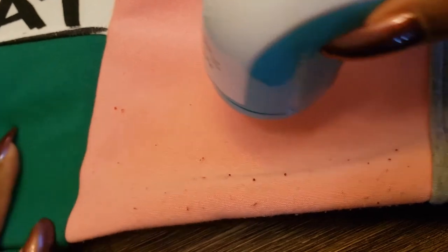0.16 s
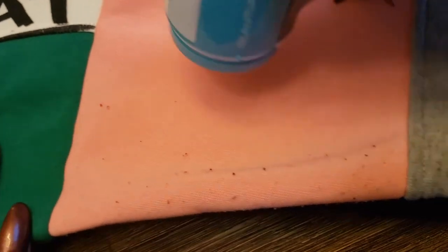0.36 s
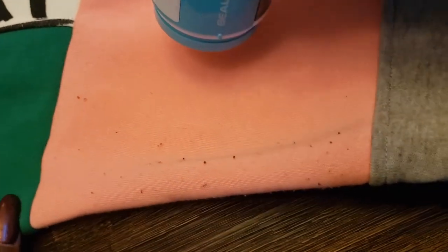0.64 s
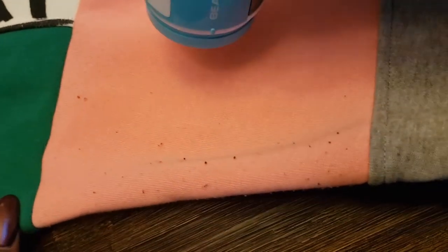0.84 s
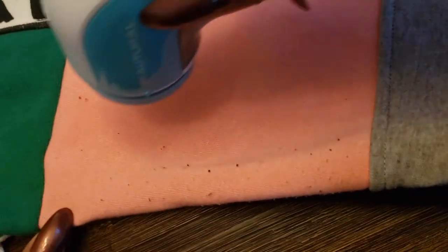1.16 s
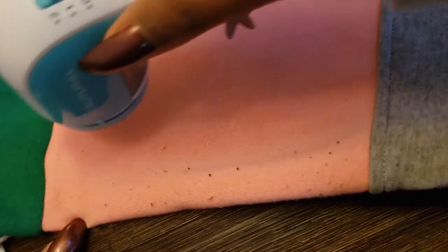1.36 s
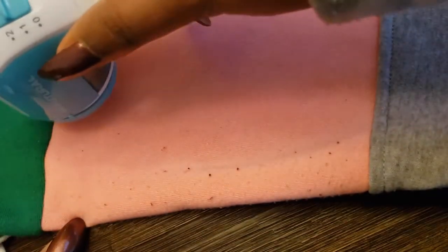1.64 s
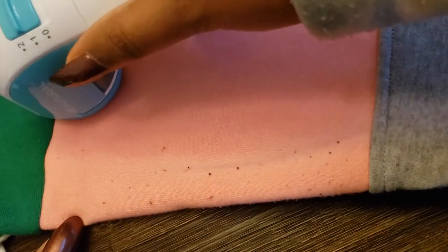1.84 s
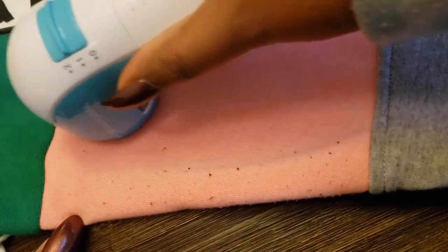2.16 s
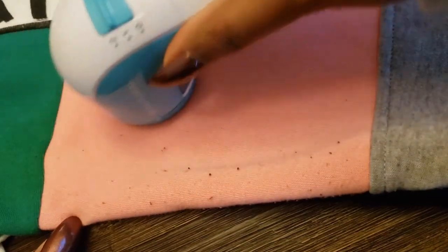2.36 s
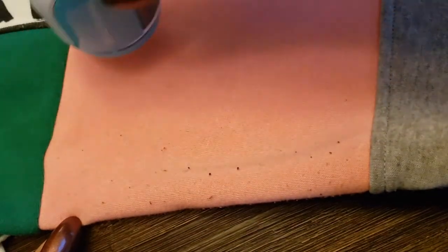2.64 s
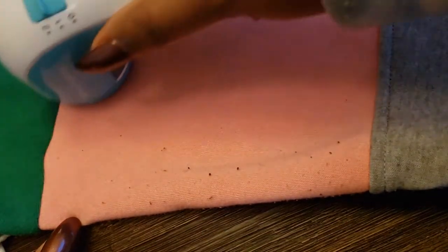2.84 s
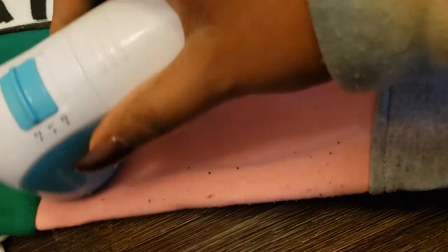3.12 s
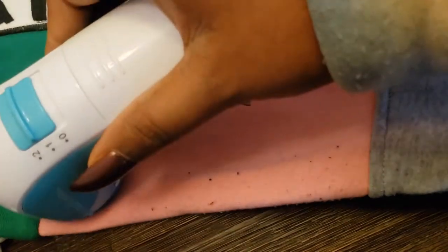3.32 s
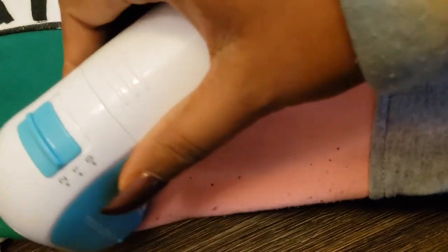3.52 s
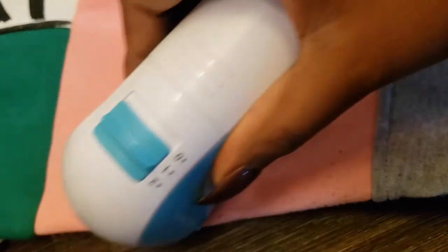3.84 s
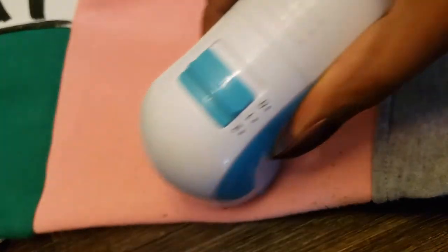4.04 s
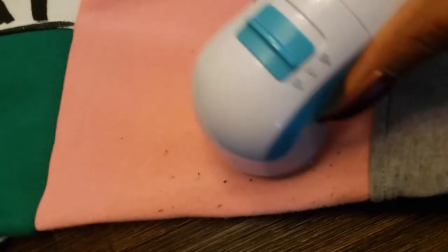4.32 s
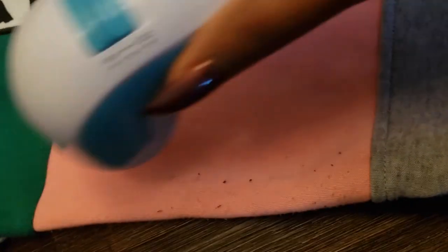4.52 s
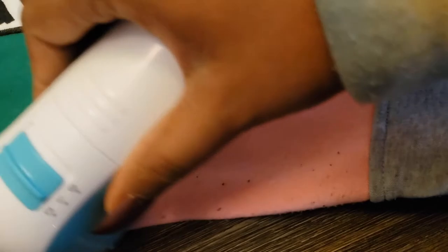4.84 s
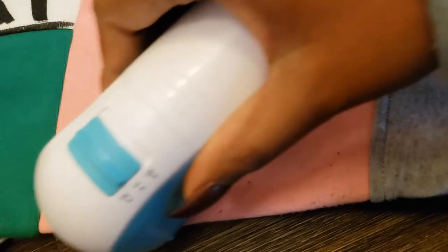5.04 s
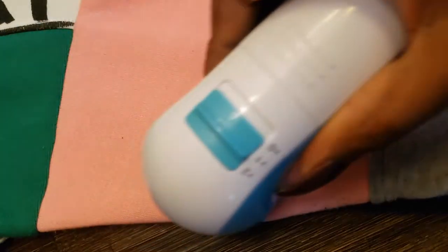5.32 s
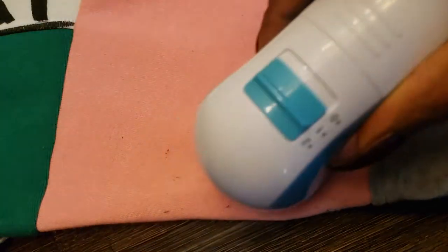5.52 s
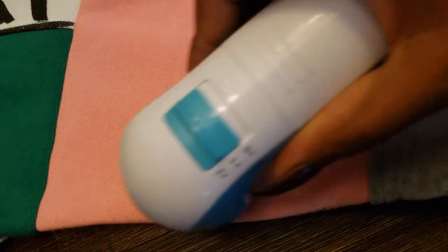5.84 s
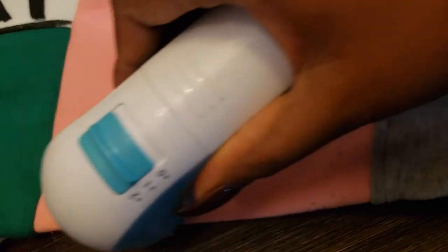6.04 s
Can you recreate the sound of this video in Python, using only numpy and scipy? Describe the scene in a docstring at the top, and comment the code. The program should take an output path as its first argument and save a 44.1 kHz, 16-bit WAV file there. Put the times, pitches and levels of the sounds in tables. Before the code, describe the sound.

It opens on a quiet room with a few soft knocks on a table. At about 0.3 seconds a small battery fabric shaver cuts in abruptly, already running and close to the microphone: a bright, metallic buzz with a thin motor whine, nearly constant in pitch. It steps up in level at 1.6 seconds. From 1.7 to 2.4 seconds, and again from 2.7 to 4.3, the head rubs over a sweatshirt, turning the buzz into a hissing rasp, with small irregular crunches as the blades catch lint. A faint low rumble and light bumps come through the table. Around 4.4 seconds the shaver mostly lifts and its buzz rings clearer and louder. From 4.8 seconds more strokes follow closely, with rasping and frequent crackles, and the shaver is still running at the end, a little after 6 seconds.

```python
"""Fabric shaver on cloth

A quiet room with soft knocks on a table gives way abruptly to a battery fabric shaver, heard close.
Its motor radiates harmonics of the shaft rate. The blades sweep the same foil holes every turn, and
this periodic excitation buzzes. Where the head meets the cloth the excitation becomes random: the
buzz turns to a rasp, lint knots crunch, and forced vibration makes the table rumble."""
import sys
import numpy as np
from scipy import signal
from scipy.fft import rfft, irfft, next_fast_len
from scipy.io import wavfile
from scipy.ndimage import uniform_filter1d, map_coordinates

SR = 44100
rng = np.random.default_rng(int(sys.argv[2]) if len(sys.argv) > 2 else 0)


def digitize_waveform(pressure):
    """Quantize a signal to 16-bit integers and store it at the path in sys.argv[1].

    Rows of a 2-D input are taken as channels; values are limited to [-1, 1].
    """
    field = np.atleast_2d(pressure).T
    bounded = np.clip(field, -1, 1)
    quanta = np.round(bounded * 32767).astype(np.int16)
    wavfile.write(sys.argv[1], SR, quanta)


N = 272614
TIME = np.arange(N) / SR
SIDES = np.array([[1], [-1]])  # left, right


def amp(db):
    """Amplitude ratio of a level in decibels."""
    return 10 ** (np.asarray(db) / 20)


def unit(x):
    """Normalisation of each channel to unit RMS."""
    return x / np.sqrt(np.mean(x ** 2, -1, keepdims=True) + 1e-20)


def curves(rows):
    """Linear interpolation in time: one value per sample for each column after the first."""
    times, *columns = np.transpose(rows)
    return [np.interp(TIME, times, column) for column in columns]


def wobble(rate):
    """Random modulation: straight lines between Gaussian values, rate of them a second."""
    knots = rng.standard_normal(int(N * rate / SR) + 2)
    return np.interp(TIME * rate, np.arange(len(knots)), knots)


def filtered(x, response):
    """Linear filtering: the spectrum of x is multiplied by a frequency response."""
    size = next_fast_len(N + SR // 2)
    return irfft(rfft(x, size) * response(np.fft.rfftfreq(size, 1 / SR)), size)[..., :N]


def colour(points):
    """Spectral envelope through (f/Hz, level/dB) points on a logarithmic frequency axis."""
    f, db = np.transpose(points)
    return lambda hz: amp(np.interp(np.log(hz + 1), np.log(f + 1), db, left=-120, right=-120))


def resonant(modes):
    """Modal superposition: second-order resonances summed with alternating sign."""
    return lambda f: sum((-1) ** k * amp(db) * 1j * f * width / (f0 * f0 - f * f + 1j * f * width)
                         for k, (f0, width, db) in enumerate(modes))


def stereo_noise(correlation):
    """Partial coherence: two channels of white noise share a common part."""
    common, opposed = rng.standard_normal((2, N))
    angle = np.arccos(np.clip(correlation, -1, 1)) / 2
    return np.cos(angle) * common + SIDES * np.sin(angle) * opposed


def shaded(x, depth_db):
    """Shadowing and reflection by hand and cloth: each channel's spectrum shifts in random patches."""
    spectra = signal.stft(x, nperseg=512)[2]
    field = uniform_filter1d(rng.standard_normal(spectra.shape), size=5, axis=1)
    field = uniform_filter1d(field, size=30, axis=2)
    return signal.istft(spectra * amp(depth_db * field / field.std()), nperseg=512)[1][:, :N]


# Room noise spectrum: f/Hz, relative density/dB
ROOM_SPECTRUM = [(24, -45), (40, -22), (548, -6.5), (704, -14.5), (817, -18), (1100, -21), (1350, -22),
                 (1450, -18), (3140, -36), (3740, -41.5), (15500, -53)]
def room(level_db=-58.5):
    """Ambient noise: a broad, mostly low spectrum, coherent in both channels."""
    return amp(level_db + wobble(25)) * unit(filtered(stereo_noise(1.0), colour(ROOM_SPECTRUM)))


# Contacts with the table: t/s, relative thud level/dB, relative tick level/dB
KNOCKS = [(0.154, -27, -42.5), (0.194, -43, -52), (0.259, -30, -55), (0.27, -52, -73)]
# Modes of the struck table and of the plastic shell: f/Hz, relative level/dB, T60/s
THUD_MODES = [(166, -13.5, 0.31), (230, 1, 0.07), (600, -26, 0.032)]
TICK_MODES = [(1950, 14, 0.018), (2670, -2, 0.038), (2880, -5.5, 0.059), (3450, 10.5, 0.013),
              (4330, -7, 0.018)]
def knocks():
    """Damped free vibration: after a soft impact the table thuds and the shell ticks."""
    out, t = np.zeros(N), TIME[:SR // 8]
    for start, thud_db, tick_db in KNOCKS:
        for modes, db, rise_s in (THUD_MODES, thud_db - 5.5, .004), (TICK_MODES, tick_db - 9.5, .001):
            ring = sum(amp(level - 60 * t / t60) * np.sin(2 * np.pi * hz * t) for hz, level, t60 in modes)
            out[round(start * SR):][:len(t)] += amp(db) * ring * (1 - np.exp(-t / rise_s))
    return out


# Modes of the table top and of the room: f/Hz, bandwidth/Hz, relative level/dB
TABLE_MODES = [(147, 10.3, 6.5), (200.2, 10.8, 6), (245, 16.3, -1), (314, 29, -3.5)]
ROOM_MODES = [(35, 24, -14), (54.5, 8.9, -0.5), (74.3, 11, 3.5)]
# Jolts of the head against the table: t/s, level/dB
JOLTS = [(1.4, -65.5), (1.72, -64.5), (2.09, -70), (3.1, -70), (3.66, -59), (3.899, -62.5), (4.9, -73),
         (5.36, -57.5), (5.66, -67)]
def rumble(head_db, load, jolt_s=0.11):
    """Forced vibration: the dragged head drives table and room modes, more strongly under load."""
    jolts = sum(amp(db) * np.exp(-((TIME - at) / jolt_s) ** 2) for at, db in JOLTS)
    drag = amp(head_db - 29 + 3 * load)
    table = (drag + jolts) * unit(filtered(stereo_noise(0.92), resonant(TABLE_MODES)))
    boom_gain = amp(-74.5 + 5.5 * load + 1.6 * wobble(1.72))
    boom = boom_gain * unit(filtered(stereo_noise(0.94), resonant(ROOM_MODES)))
    return (table + boom) * amp(-0.8 * SIDES)


# Spectrum of the fan behind the blades: f/Hz, relative density/dB
FAN_SPECTRUM = [(250, -5), (400, -3.5), (800, -0.5), (1400, -5), (2500, 0.5), (4000, -8.5), (5500, -22)]
def fan(head_db, load):
    """Flow noise: air rushing through the head radiates a continuous spectrum."""
    return amp(head_db - 20 + 3.75 * load) * unit(filtered(stereo_noise(0.84), colour(FAN_SPECTRUM)))


# Strokes on the cloth: start t/s, end t/s, load (share of rasp, 0-1), rubbing level/dB
STROKES = [(1.72, 2.404, 0.61, -54.5), (2.69, 3.315, 0.56, -55.5), (3.348, 3.81, 0.68, -58),
           (3.817, 4.037, 0.7, -49.5), (4.03, 4.31, 0.85, -44.5), (4.415, 4.53, 0.43, -65),
           (4.754, 5.049, 0.9, -56), (5.06, 5.434, 0.72, -48.5), (5.447, 5.637, 0.6, -47.5),
           (5.615, 6.255, 0.74, -46)]
def cloth_contact(ramp_s=0.07, idle_load=0.07):
    """Contact loading: load and rubbing amplitude rise as the head lands and fall as it lifts."""
    start, end, load, rub_db = np.transpose(STROKES)
    inside_s = np.minimum(TIME - start[:, None], end[:, None] - TIME)
    contact = np.clip(inside_s / ramp_s + .5, 0, 1)
    return np.clip(load @ contact, idle_load, 1), amp(rub_db) @ contact


# Spectrum of cloth brushing the foil: f/Hz, relative density/dB
RASP_SPECTRUM = [(1200, -8.5), (1700, -2), (2100, 1), (2450, 5.5), (3000, -2.5), (3600, -4.5), (4800, -4.5),
                 (6000, -42)]
def cloth_rasp(turns, rub):
    """Stick-slip friction: threads catch and let go at uneven moments, tugged anew every turn."""
    tugs = np.cumsum(150 * amp(9.1 * wobble(90))) / SR
    grain = amp(-13 * np.sqrt(tugs % 1) + 3 * wobble(140) + 1.5 * wobble(15) - 5 * (turns % 1))
    gain = rub * amp(1.5 * wobble(6) + 1.5 * wobble(30))
    friction = filtered(stereo_noise(-0.035) * grain, colour(RASP_SPECTRUM))
    return gain * unit(shaded(friction, depth_db=1.5)) * amp(SIDES)


# Lint knots caught by a blade: t/s, relative grit level/dB, relative crunch level/dB
SNAGS = [(1.767, -43, -40), (2.053, -32, -46), (2.2, -40, -42), (2.798, -38, -50), (3.032, -45, -40),
         (3.413, -33, -43), (3.552, -48, -42), (3.6793, -30, -37), (3.794, -44, -34), (3.9457, -30, -46),
         (4.0595, -39, -41), (4.1056, -35, -31), (4.198, -34, -34), (4.872, -42, -31), (5.034, -42, -42),
         (5.1042, -30, -33), (5.14, -44, -32), (5.205, -42, -31), (5.559, -42, -36), (5.645, -47, -33),
         (5.735, -40, -30.5), (5.8594, -39, -42), (5.954, -40, -44)]
# Spectra at the foil (grit) and through the shell (crunch): f/Hz, relative density/dB
GRIT_SPECTRUM = [(1200, -10), (2400, 1), (4500, 5), (7000, -2), (11000, 24), (16000, 2)]
CRUNCH_SPECTRUM = [(1200, -16), (1800, 5), (2400, 7.5), (3100, -3), (4200, -4), (6000, -18)]
def snags(rise_s=0.00066):
    """Transient excitation: each knot gives decaying bursts of bright grit and duller crunch."""
    gains, t = np.zeros((2, N + SR)), TIME[:SR // 20]
    t60 = np.array([[.07], [.05]])  # grit, crunch
    burst = amp(-6 - 60 * t / t60) * (1 - np.exp(-t / rise_s))
    for start, grit_db, crunch_db in SNAGS:
        gains[:, round(start * SR):][:, :len(t)] += amp([[grit_db], [crunch_db]]) * burst
    return sum(gain[:N] * unit(filtered(stereo_noise(0.17), colour(spectrum)))
               for gain, spectrum in zip(gains, (GRIT_SPECTRUM, CRUNCH_SPECTRUM)))


# Rotation rate of the shaft: t/s, f/Hz
SHAFT_RATE = [(0.3, 114.5), (0.73, 114.8), (1.25, 114.3), (1.69, 115.0), (1.87, 113.5), (2.05, 113.5),
              (2.38, 115.7), (2.8, 115.3), (3.33, 116.0), (4.21, 116.0), (4.4, 116.8), (4.62, 115.0),
              (4.92, 115.3), (5.05, 116.1), (5.54, 116.4), (5.8, 115.8), (6.02, 114.1), (6.18, 114.0)]
def shaft_turns():
    """Phase as the integral of frequency, counted in turns of the shaft."""
    return np.cumsum(curves(SHAFT_RATE)[0]) / SR


# Armature hum (order 6) as the grip shifts: t/s, level/dB
HUM = [(0.3, -63.5), (0.31, -62.5), (1.4, -62), (1.48, -62), (1.74, -56.5), (2.0, -58), (2.05, -67),
       (2.18, -57), (2.35, -60.5), (2.82, -56.5), (3.0, -62.5), (3.07, -57.5), (3.2, -60.5), (3.28, -55.5),
       (3.44, -63), (3.56, -53), (3.79, -61), (3.85, -54), (3.93, -59), (4.2, -54), (4.28, -57.5),
       (4.54, -52.5), (4.77, -56), (4.88, -51.5), (5.0, -54.5), (5.07, -60.5), (5.28, -51.5), (5.38, -55.5),
       (5.9, -52), (6.02, -58), (6.15, -50.5), (6.18, -52)]
# Tones through the shell: t/s, order 3 level/dB, order 18 level/dB, its left lead/rad, order 30 level/dB
SHELL_TONES = [(.3, -76.5, -59.5, -1.5, -61), (.9, -75, -55, -0.5, -56.5), (1.5, -76.5, -58.5, -2.5, -62),
               (1.77, -67.5, -58, -3, -58), (2.15, -72, -67, -2.5, -77), (2.5, -74, -52, -1.5, -60),
               (3.0, -67, -59, -3.5, -50), (3.35, -79, -59, -4, -69), (3.55, -62, -61, 1.5, -62),
               (3.9, -68.5, -57, 1.7, -53.5), (4.15, -73, -48.5, -0.5, -44.5), (4.55, -72, -47.5, -2, -57),
               (4.85, -59.5, -53, -2.5, -64), (5.08, -62, -55, -5.5, -48), (5.3, -64, -51.5, -8, -44),
               (5.7, -69, -48, -6, -48), (5.95, -62, -54, -4.5, -53), (6.18, -69, -43, -4.5, -49)]
# Further harmonics of motor and shell: order, level/dB re smoothed hum, left lead/rad
MOTOR_ORDERS = [(1, -17, 0.5), (5, -13.5, 0.95), (8, -15, 0.79), (9, -11.5, 0.88), (10, -11.5, 1.97),
                (11, -8.5, 0.86), (12, -4.5, 2.48), (13, -11, 4.2), (16, -14.5, 1.3), (17, -4, 3.5),
                (20, -13, 3.6), (21, -10, 3.7), (22, -8, 3.7), (23, -9.5, 4.1), (24, -17, 3.4),
                (25, -8, 3.7), (26, -10.5, 3.85), (27, -12, 3.5), (28, -26, 4.4), (29, -24, 1.3),
                (31, -16.5, 2.5), (33, -11, 2.8), (35, -17.5, 3.9), (36, -15.5, 2.2), (37, -15, 1.9),
                (39, -20, 3.4), (40, -17, 3), (42, -16, 1.9), (43, -10, 3.46)]
# Ring of the foil as the head tilts, lifts and is damped by cloth: t/s, level/dB
FOIL_RING = [(.3, -51.5), (1.02, -52), (1.1, -57.5), (1.35, -49.5), (1.7, -52), (2.15, -59), (2.36, -53.5),
             (2.56, -47.5), (2.66, -51), (2.74, -49.5), (2.9, -55.5), (3.33, -52), (3.55, -60.5),
             (3.8, -55.5), (4.21, -61), (4.39, -41), (4.47, -56), (4.57, -41.5), (4.7, -48), (4.93, -56.5),
             (5.2, -54), (5.83, -52.5), (5.98, -60), (6.04, -49.5), (6.18, -54)]
# Blade harmonics on the foil's main modes: order, level/dB re ring
RING_ORDERS = [(45, -18), (46, -11), (47, -6), (48, -1), (49, -4), (50, -12), (51, -16), (52, -13),
               (53, -17), (54, -4), (55, -14), (56, -13), (57, -16), (58, -8), (59, -11), (60, -13),
               (61, -9), (62, -16)]
def motor(turns, load):
    """Harmonics of rotation: six armature slots hum, higher orders whine and drive the foil."""
    low_db, whine_db, whine_lead, upper_db = curves(SHELL_TONES)
    hum_db, = curves(HUM)
    smooth_hum_db = uniform_filter1d(hum_db, SR)
    ring_db, = curves(FOIL_RING)
    partials = [(3, low_db + 3 * wobble(6), 1.6),
                (6, hum_db + (0.24 + 1.2 * load) * wobble(12), 0.4),
                (18, whine_db + 3.5 * load * wobble(14), whine_lead),
                (30, upper_db - 6 * load + 3 * wobble(16), 1.85)]
    partials += [(order, smooth_hum_db + db + 3.4 * wobble(7), lead) for order, db, lead in MOTOR_ORDERS]
    partials += [(order, ring_db + db + 2.2 * wobble(8), 1) for order, db in RING_ORDERS]
    jitter = .04 + .05 * load  # the load shakes the phase
    out = np.zeros((2, N))
    for order, db, lead in partials:
        phase = 2 * np.pi * ((order * turns + rng.random()) % 1) + jitter * np.sqrt(order) * wobble(40)
        path_phase = lead + .07 * np.sqrt(order) * wobble(1.5)  # the two paths shift as the hand moves
        out += np.sqrt(2) * amp(db) * np.sin(phase + SIDES * path_phase / 2)
    return out


# Hiss of cut fibres: f/Hz, relative density/dB
FIBRE_SPECTRUM = [(4400, -19), (5100, -13.5), (5600, -9), (7000, -2.5), (9000, -3.5), (11000, -5.5),
                  (12500, -3.5), (14000, -1.5), (16000, -8.5)]
# Foil modes that still ring under cloth: f/Hz, bandwidth/Hz, relative level/dB
LOADED_MODES = [(5600, 200, 3), (6250, 200, -1), (9550, 150, 4), (11100, 250, 9), (12350, 300, 3)]
def fibre_hiss(blade_pulse):
    """Amplitude-modulated noise: fibres are cut at uneven moments and excite the loaded foil."""
    cuts = np.cumsum(200 * amp(5.5 * wobble(120))) / SR
    snips = amp(-11 * np.sqrt(cuts % 1) + 2.4 * wobble(25))
    response = lambda f: colour(FIBRE_SPECTRUM)(f) * (1 + np.abs(resonant(LOADED_MODES)(f)))
    return unit(filtered(stereo_noise(0.11) * blade_pulse * snips, response))


def hole_scrape(turns, load, steps=1536, patterns_per_s=3.2):
    """Quasi-periodic excitation: a rough pattern repeats each turn and drifts as the hand turns."""
    rows, points = int(N / SR * patterns_per_s) + 3, steps // 4
    roughness = rng.standard_normal((2, rows, points))
    roughness += 0.32 * rng.standard_normal((2, 1, points))  # constant in time
    roughness += 0.56 * rng.standard_normal((rows, points))  # common to both channels
    orders = rfft(roughness)
    orders *= amp(2.2 * rng.standard_normal(orders.shape[1:]))  # a few orders stand out
    pattern = signal.resample(irfft(orders), steps, axis=2)
    pattern = np.concatenate([pattern, pattern[..., :1]], 2)  # close the circle
    rotor = turns + (.0004 + .0003 * load) * wobble(90)  # the load makes the rotor stutter
    position = [TIME * patterns_per_s, rotor % 1 * steps]
    scrape = np.array([map_coordinates(side, position, order=1) for side in pattern])
    return scrape / np.sqrt(np.abs(uniform_filter1d(scrape ** 2, SR // 10)))


# Level and balance of the shaver's buzz, with a sudden step louder at 1.57 s:
# t/s, relative level/dB, left minus right level/dB
HEAD = [(0.3, -44, -3), (0.35, -43.5, -3), (0.41, -44.5, -0.5), (0.87, -43, -1), (1.02, -42, 2),
        (1.38, -43.5, -1.5), (1.54, -44, -1), (1.59, -38.5, 2), (1.66, -40.5, 4), (1.99, -43, 0.5),
        (2.05, -39, 1), (2.1, -43, 1.5), (2.28, -42, 0.5), (2.35, -42, 0.0), (2.38, -39, -0.5),
        (2.76, -40.5, 1.5), (3.25, -41.5, 0.5), (3.35, -39.5, 0), (3.56, -42, 1), (3.67, -41, 1.0),
        (3.92, -41, 0.5), (4.02, -40.5, -3), (4.38, -36, -1.0), (4.67, -36, -0.5), (4.75, -36.5, 2),
        (4.8, -38.5, 1), (5.23, -39.5, -0.5), (5.49, -39, -4.5), (6.08, -35.5, 2), (6.18, -38, -1)]
# Modes of foil and shell: f/Hz, bandwidth/Hz, relative level/dB
FOIL_MODES = [(5400, 490, -10), (6300, 660, -11), (6940, 520, -4), (8060, 540, -0.5), (9770, 600, 1.5),
              (11000, 960, -0.5), (12320, 460, 4.5), (13660, 900, 3), (15440, 640, 4)]
# Transmission of the scrape through the shell: f/Hz, relative level/dB
SHELL_RESPONSE = [(1500, -25.5), (1900, -6), (2700, -9.5), (3300, -10), (4200, -16.5), (5000, -12.5),
                  (6500, -13), (7000, -36)]
def blades(turns, load, head_db, pan_db, cutoff_hz=4900, lag_samples=7):
    """Source and filter: the scrape drives foil and shell; cloth trades the foil's buzz for hiss."""
    scrape = hole_scrape(turns, load)
    pulse = amp(-2.2 * (turns % 1) - 2.5 * (3 * turns % 1))  # each of three blades bites and eases off
    # The small foil radiates little below the cutoff.
    foil = lambda f: resonant(FOIL_MODES)(f) / np.sqrt(1 + (cutoff_hz / (f + 1)) ** 8)
    buzz = np.sqrt(1 - 0.73 * load) * unit(filtered(scrape * pulse, foil))
    rattle = amp(-15 + 4.64 * load) * unit(filtered(scrape * pulse, colour(SHELL_RESPONSE)))
    hiss = np.sqrt(load) * fibre_hiss(pulse)
    left, right = unit(shaded(buzz + rattle + hiss, depth_db=2.6))
    flutter_db = (0.44 + 1.02 * load) * wobble(22)
    gain = amp(head_db + 2.5 + flutter_db + SIDES * pan_db / 2)
    return gain * [left, np.roll(right, lag_samples)]  # the sound reaches the right side later


def scene(change_s=0.29, fade_s=0.014):
    """Superposition of sources in two scenes: the quiet room fades out, the running shaver fades in."""
    turns = shaft_turns()
    load, rub = cloth_contact()
    head_db, pan_db = curves(HEAD)
    quiet = room() + knocks()
    shaver = motor(turns, load) + blades(turns, load, head_db, pan_db)
    shaver += cloth_rasp(turns, rub) + fan(head_db, load) + rumble(head_db, load) + snags()
    shaver *= 1 - 0.7 * np.clip(1 - np.abs(TIME - 4.049) / .011, 0, 1)  # the level dips briefly
    fade = (TIME - change_s) / fade_s
    return quiet * np.clip(-fade, 0, 1) + shaver * np.clip(fade, 0, 1)


def record(dry, top_hz=15780):
    """Band limiting by an ideal low-pass filter."""
    return filtered(dry, lambda hz: hz < top_hz)


dry = scene()
out = record(dry)
digitize_waveform(out)
```